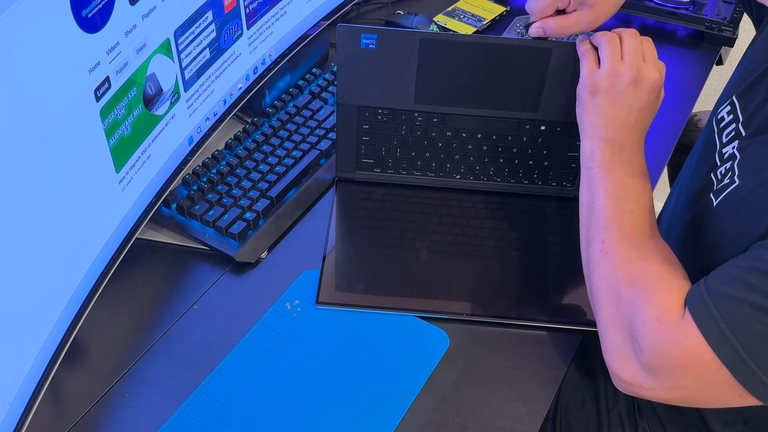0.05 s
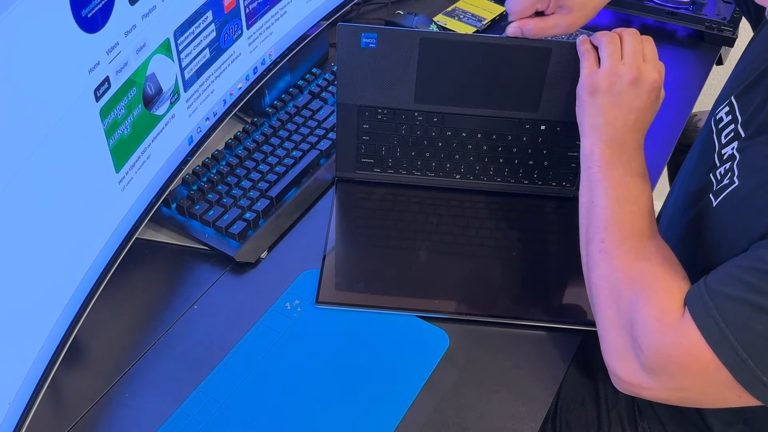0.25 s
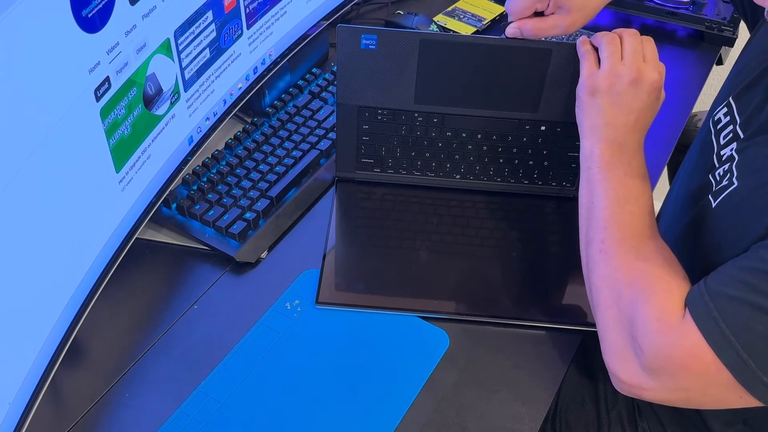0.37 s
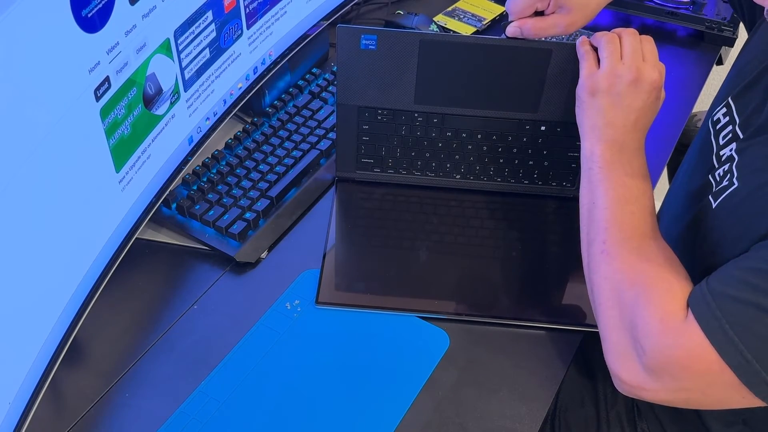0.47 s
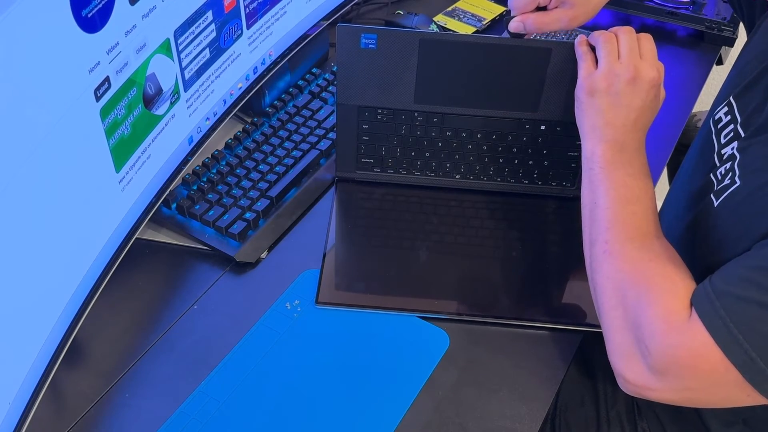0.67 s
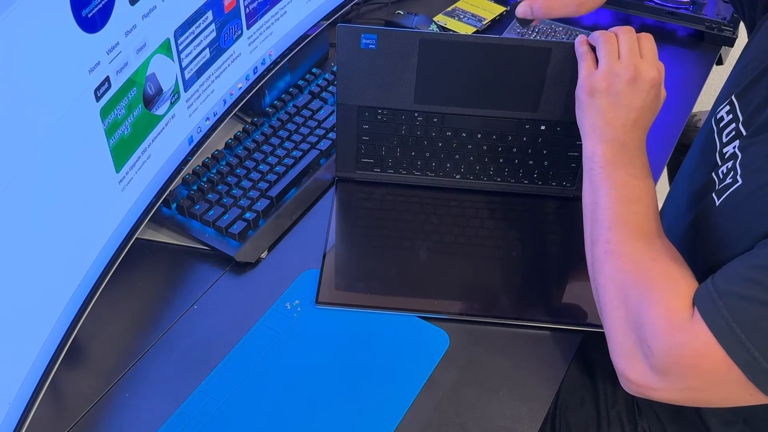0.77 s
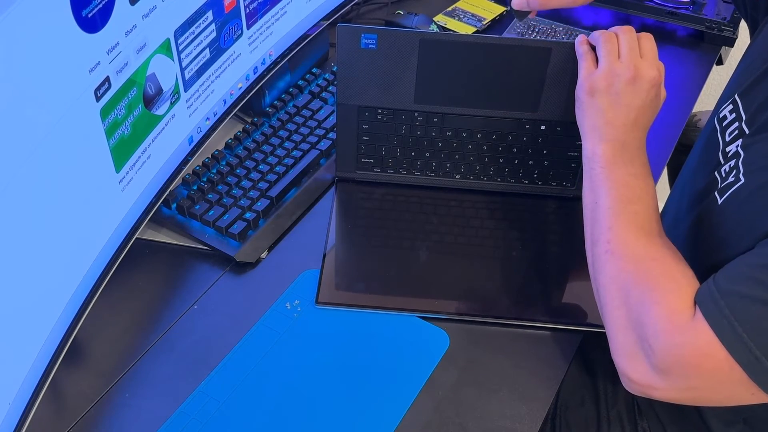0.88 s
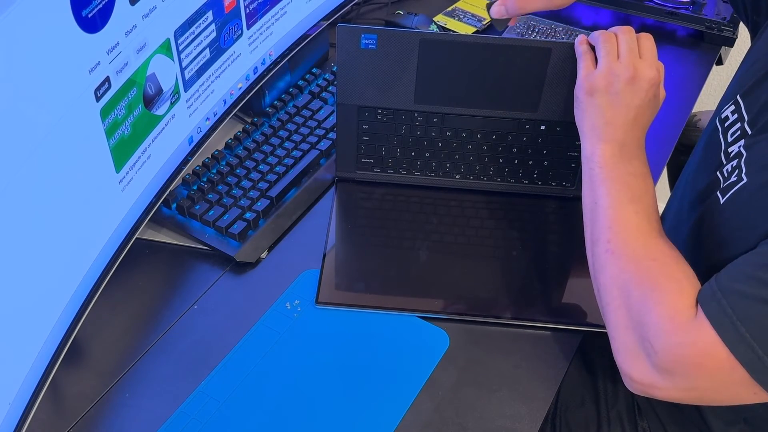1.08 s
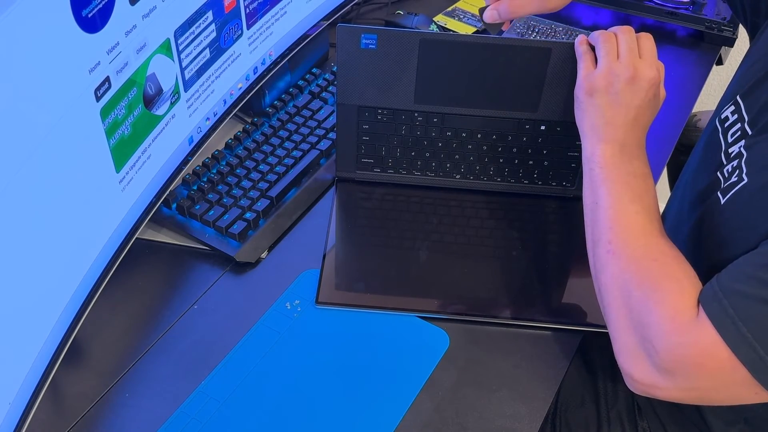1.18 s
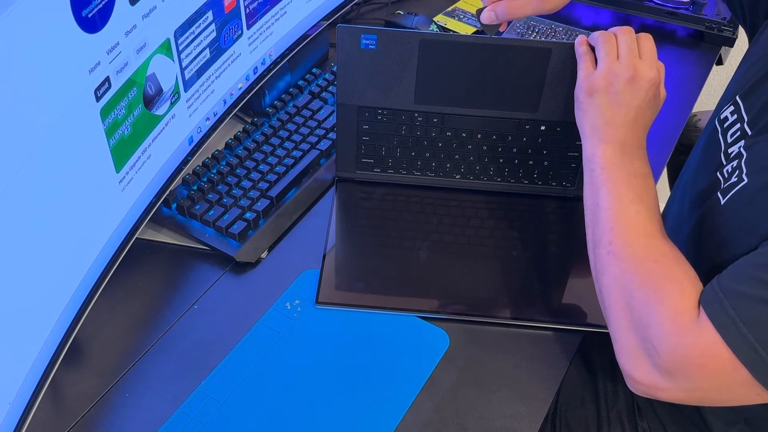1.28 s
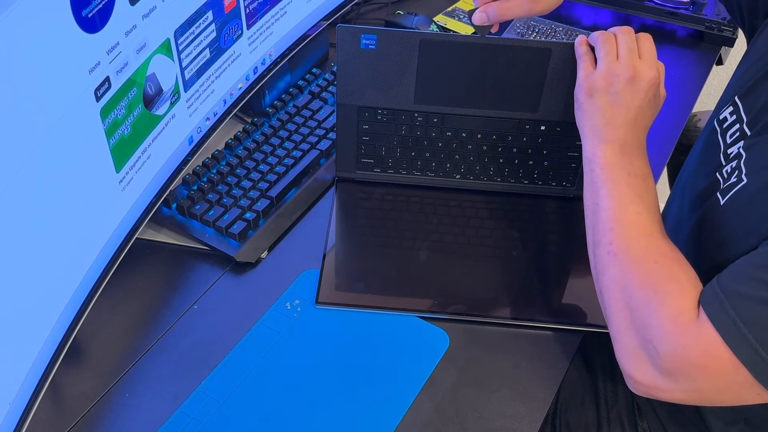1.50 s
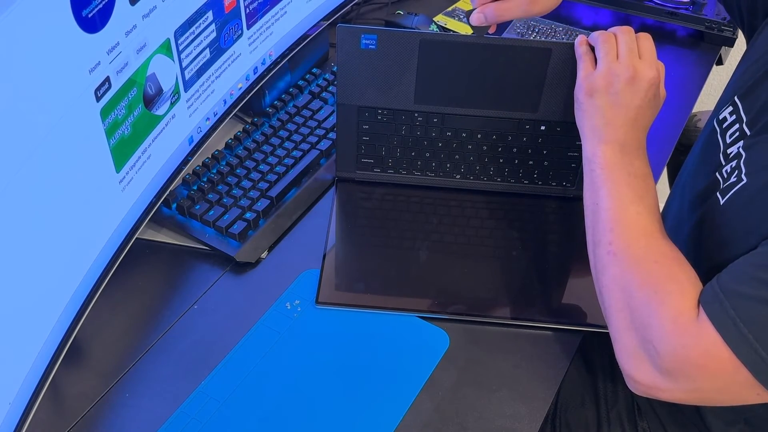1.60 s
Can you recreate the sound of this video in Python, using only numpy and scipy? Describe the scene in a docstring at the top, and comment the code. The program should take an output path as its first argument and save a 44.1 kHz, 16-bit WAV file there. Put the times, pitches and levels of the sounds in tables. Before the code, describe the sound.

A laptop clacks loudly onto a desk after a brief slide, shaking the desk top. A short scrape, soft bumps and light plastic clicks follow, close to the microphone in a quiet room with humming computer fans.

```python
"""Computer fans hum in a quiet room, and something slides on a desk close to a small stereo microphone.
It lands with a loud clack that rings a laptop's case, overloads the microphone and shakes the desk.
A short scrape, soft bumps and light clicks of small plastic things follow. Slides are grainy friction
noise; each contact is a burst of noise plus the damped modes of the case, the part or the desk top."""
import sys
import numpy as np
from scipy import signal
from scipy.fft import rfft, irfft, next_fast_len
from scipy.io import wavfile
from scipy.ndimage import map_coordinates

SR = 44100
rng = np.random.default_rng(int(sys.argv[2]) if len(sys.argv) > 2 else 0)


def int16_out(signal):
    """Quantize to a 16-bit WAV file."""
    q = np.round(np.clip(np.atleast_2d(signal).T, -1, 1) * 32767)
    wavfile.write(sys.argv[1], SR, q.astype(np.int16))


N = 72765

# the clack's tick, main crack, lighter contact and reflection: t/s, crack level/dB, case ring level/dB
CLACK_PARTS = [(0.2313, -12, -33), (0.2325, 0.5, 1.5), (.2364, -12.5, -26.5), (.2448, -11.5, -27)]
# likeness of the room's sound at the two ports: f/Hz, left-right correlation
ROOM_CORRELATION = [(130, 1), (300, 1), (600, .1), (1400, 0.12), (3000, 0.86), (7000, 0.97), (14000, .6)]
# decay of the room's quick tail: f/Hz, t60/s
ROOM_DECAY = [(100, 0.34), (500, .42), (1500, .42), (4000, 0.39), (8000, 0.34), (14000, .27)]
# colour of the room's lingering tail: f/Hz, level/dB
LATE_SPECTRUM = [(300, -2), (900, 7.5), (2000, -3), (5000, -12.5), (8000, -19), (12000, -29.5)]


def amp(db):
    return 10 ** (np.asarray(db) / 20)


def unit_rms(x):
    return x / np.sqrt(np.mean(x ** 2) + 1e-20)


def along(points, hz):
    """Read (f/Hz, value) points on a log frequency axis."""
    f, values = np.transpose(points)
    return np.interp(np.log(hz + 1), np.log(f + 1), values)


def wobble(rate):
    """A smooth random curve, rate knots a second."""
    return map_coordinates(rng.standard_normal(4096), [np.arange(N) * rate / SR], mode="wrap")


def filtered(x, response):
    """Filter x by a complex response of frequency."""
    size = next_fast_len(N + SR // 2)
    return irfft(rfft(x, size) * response(np.fft.rfftfreq(size, 1 / SR)), size)[..., :N]


def noise(spectrum, tilt_db=0, size=N):
    """Coloured noise of rms 1, tilted per octave."""
    padded = next_fast_len(size)
    hz = np.fft.rfftfreq(padded, 1 / SR)
    white = rfft(rng.standard_normal(padded))
    gain = amp(along(spectrum, hz) + tilt_db * np.log2(hz + 1))
    return unit_rms(irfft(white * gain, padded)[:size])


def stereo_noise(spectrum, correlation):
    """Coloured noise with a given left-right correlation."""
    def mid_side_gains(hz):
        angle = np.arccos(np.clip(along(correlation, hz), -1, 1)) / 2
        return np.array([np.cos(angle), np.sin(angle)])
    mid, side = filtered(np.array([noise(spectrum), noise(spectrum)]), mid_side_gains)
    return np.array([mid + side, mid - side])


def fade(t, t60):
    """Exponential decay by 60 dB in t60."""
    return np.exp(-np.log(1000) * t / np.maximum(t60, 1e-3))


def dying(x, t60s):
    """Each frequency of x dies at its own speed."""
    hz, t, bands = signal.stft(x, SR, nperseg=128)
    return signal.istft(bands * fade(t, along(t60s, hz)[:, None]), SR, nperseg=128)[1][..., :N]


def ring(modes, attack_cycles, scatter_db=1):
    """Damped modes after one contact; the lower ones take longer to build."""
    t = np.arange(SR // 3) / SR
    out = np.zeros_like(t)
    for hz, db, t60 in modes:
        envelope = fade(t, t60) * (1 - np.exp(-t * hz / attack_cycles))
        out += amp(db + scatter_db * rng.normal()) * envelope * np.sin(2 * np.pi * hz * t)
    return out


def add(track, start_s, sound):
    """Mix a sound into the track."""
    part = track[max(round(start_s * SR), 0):][:len(sound)]
    part += sound[:len(part)]


def fans():
    """Computer fans behind everything: steady air noise and a few slightly unsteady hum lines."""
    # hum of fans and mains: f/Hz, level/dB
    hum_lines = [(121, -48), (162, -58.5), (200, -54), (284, -51.5), (308, -51.5)]
    # moving air: f/Hz, level/dB
    air_spectrum = [(20, -25), (40, -6.5), (65, 0), (110, -1.5), (200, -2), (300, -1), (500, -8),
                    (900, -14), (2000, -22), (3000, -37), (4500, -44), (9000, -51.5), (10500, -43.5),
                    (11600, -36.5), (12400, -48.5), (15500, -43)]
    # its likeness at the two ports: f/Hz, left-right correlation
    air_correlation = [(100, 0.98), (300, 0.55), (700, 0.31), (1400, .4), (3000, .8), (7000, 1), (14000, 1)]
    t, hum = np.arange(N) / SR, np.zeros(N)
    for hz, db in hum_lines:
        peak = amp(db + 0.57 * wobble(4.6)) * np.sqrt(2)
        hum += peak * np.sin(2 * np.pi * hz * t + 0.6 * wobble(8))
    return amp(-42 + 0.23 * wobble(11)) * stereo_noise(air_spectrum, air_correlation) + hum


def slides():
    """Grainy friction on the desk swells, holds and stops with each push, and rings the sliding part."""
    # pushes: t/s, attack/s, hold/s, release/s, hiss level/dB, tilt/(dB per octave), body level/dB
    strokes = [(0.024, .03, 0.023, .14, -45.5, 1, -65), (0.137, .02, 0.069, 0.11, -48.5, -0.3, -49.5),
               (.63, 0.036, .02, 0.042, -42, -3.2, -57.5), (0.662, 0.01, .04, 0.019, -35, 0, -37)]
    # rubbing noise: f/Hz, level/dB
    rub_spectrum = [(200, -16), (400, 2.5), (900, -5), (1600, 4.5), (2800, -1.5), (3300, -4.5), (6000, -10),
                    (8000, -9.5), (9500, -13.5), (11500, -6), (15000, -8)]
    # resonances of the sliding part: f/Hz, width/Hz, level/dB
    resonances = [(428, 51, -2), (1340, 50, -5.5), (1561, 30, -2), (1700, 43, -4), (2150, 30, -0.5),
                  (2370, 50, -3), (2800, 53, -6)]
    grain_db, catches_per_s = 1.5, 300

    def body_response(hz):
        return sum((-1) ** k * amp(db) * 1j * hz * width / (centre ** 2 - hz ** 2 + 1j * hz * width)
                   for k, (centre, width, db) in enumerate(resonances))
    t, out = np.arange(N) / SR, np.zeros(N)
    for start, attack, hold, release, hiss_db, tilt_db, body_db in strokes:
        envelope = np.interp(t, start + np.cumsum([0, attack, hold, release]), [0, 1, 1, 0])
        friction = unit_rms(noise(rub_spectrum, tilt_db) * amp(grain_db * wobble(catches_per_s)))
        body = unit_rms(filtered(friction, body_response))
        out += envelope * (amp(hiss_db) * friction + amp(body_db) * body)
    return out


def room_tail(spectrum, late_db):
    """The small room's decay in stereo: a quick tail and a fainter one that lingers."""
    quick = dying(stereo_noise(spectrum, ROOM_CORRELATION), ROOM_DECAY)
    late = stereo_noise(LATE_SPECTRUM, ROOM_CORRELATION) * fade(np.arange(N) / SR, t60=1)
    return quick + amp(late_db) * late


def room_reverb(x):
    """The room answers light handling after a short delay."""
    # colour of the quick tail: f/Hz, level/dB
    room_spectrum = [(80, -1), (300, -1), (600, -0.5), (1000, -1), (2500, -5), (5000, -1), (8000, -2.5),
                     (14000, -2)]
    t, delay_s = np.arange(N) / SR, 0.006
    tail = room_tail(room_spectrum, late_db=-23) * np.clip(t / delay_s - 1, 0, 1)
    return signal.fftconvolve(x[None], tail / np.linalg.norm(tail[0]), axes=1)[:, :N]


def clack():
    """Close up, a tick, the main crack and a lighter contact ring the case; a quick reflection follows."""
    # the crack: f/Hz, level/dB
    crack_spectrum = [(150, -16.5), (450, -2), (750, -8), (1000, -7.5), (1500, 1), (2800, 1), (3400, -7),
                      (5000, -5), (8000, -2.5), (9500, -13.5), (12000, -4), (15500, -5.5)]
    # its decay: f/Hz, t60/s
    crack_decay = [(300, 0.065), (2000, 0.045), (7000, 0.028), (14000, 0.017)]
    # modes of the laptop's case: f/Hz, level/dB, t60/s
    case_modes = [(299, -10, 0.061), (418.2, -4.5, .03), (508.9, 1.5, 0.022), (571, 2.5, 0.024),
                  (787.6, -15, .1), (990, -21.5, 0.061), (1253, -9.5, .06), (1456, -6, 0.044),
                  (1557, -9.5, .05), (1887, -10.5, 0.051), (2070, -19.5, 0.12), (2550, -18, 0.18),
                  (2710, -26, .18), (2927, -11.5, .07), (3880, -20, .08), (4317, -25, 0.15),
                  (4675, -19, 0.073), (8226, -26, .08)]
    out = np.zeros(N)
    for start, crack_db, ring_db in CLACK_PARTS:
        add(out, start, amp(crack_db) * dying(noise(crack_spectrum, size=8192), crack_decay))
        add(out, start, amp(ring_db) * ring(case_modes, attack_cycles=2.4))
    return out


def clack_wash():
    """The clack's main crack fills the room with an even tail."""
    # the room's answer to the clack: f/Hz, level/dB
    wash_spectrum = [(80, -8.5), (200, -3.5), (350, -1.5), (600, 1.5), (900, 0.5), (1400, 2), (2000, -6.5),
                     (2800, -4.5), (3400, -12.5), (5500, -13.5), (8000, -9.5), (9500, -22.5), (12000, -13),
                     (15500, -19)]
    t, out = np.arange(N) / SR, np.zeros((2, N))
    start, rise_s = CLACK_PARTS[1][0], 0.007
    tail = room_tail(wash_spectrum, late_db=-17.5) * np.clip(t / rise_s, 0, 1)
    for channel, sound in zip(out, tail):
        add(channel, start, amp(-12.5) * sound)
    return out


def desk_bumps():
    """Soft pushes thud and set the desk top booming, each favouring the modes near one frequency."""
    # bumps on the desk: t/s, boom level/dB, favoured f/Hz, thud level/dB
    bumps = [(0.244, -22.5, 75.5, -38), (0.299, -28, 80, -56), (.353, -21.5, 126, -28),
             (.927, -31.5, 96, -50), (1.256, -38, 89.8, -50), (1.562, -24, 98, -57.5),
             (1.601, -27.5, 96, -52)]
    # modes of the desk top: f/Hz, level/dB, t60/s
    desk_modes = [(65, 1.5, 0.56), (96, 2, 0.29), (122.4, 1, .2), (160, -6, .12)]
    # dull thud: f/Hz, level/dB
    thud_spectrum = [(50, -12), (150, -2.5), (300, -2), (450, -12.5), (800, -18.5), (2000, -40),
                     (6000, -70)]
    fall_db_per_octave, rise_s = 22.5, 0.0037
    t, out = np.arange(N) / SR, np.zeros(N)
    thud_envelope = fade(t, t60=0.24) * np.clip(t / rise_s, 0, 1)
    for start, boom_db, push_hz, thud_db in bumps:
        modes = [(hz, db - fall_db_per_octave * abs(np.log2(hz / push_hz)), t60)
                 for hz, db, t60 in desk_modes]
        add(out, start, amp(boom_db) * ring(modes, attack_cycles=0.87))
        add(out, start, amp(thud_db) * noise(thud_spectrum) * thud_envelope)
    return out


def plastic_clicks():
    """Small plastic parts catch, are set down and rattle: each contact snaps and rings briefly."""
    # light contacts: t/s, snap level/dB, ring level/dB, tilt/(dB per octave)
    contacts = [(.682, -36, -55.5, 17), (.714, -36.5, -60, 18), (1.477, -54, -86, 2), (1.5635, -39, -50, 1),
                (1.5672, -29, -42.5, .5), (1.5705, -33.5, -43, 3), (1.578, -36, -49.5, -0.5),
                (1.593, -41.5, -45.5, 0.5), (1.605, -39.5, -54, -1), (1.641, -47, -60, -0.5)]
    # snap of a contact: f/Hz, level/dB
    snap_spectrum = [(300, 2), (1000, -0.5), (1600, -0.5), (2500, -4), (4000, -2), (6000, -7.5), (8300, -1),
                     (10000, -4.5), (13000, -10.5), (15500, -16)]
    # its decay: f/Hz, t60/s
    snap_decay = [(500, 0.055), (4000, .05), (14000, 0.016)]
    # modes of the small part: f/Hz, level/dB, t60/s
    part_modes = [(3840, 5, .04), (4020, -4, .035), (4600, -3, .06), (6400, -4, .04), (7000, -19, .04),
                  (8000, -1, .03), (8410, 2, .05), (10700, -5, 0.029)]
    out = np.zeros(N)
    for start, snap_db, ring_db, tilt_db in contacts:
        add(out, start, amp(snap_db) * dying(noise(snap_spectrum, tilt_db, size=8192), snap_decay))
        add(out, start, amp(ring_db) * ring(part_modes, attack_cycles=2.4, scatter_db=6))
    return out


def port_response(hz):
    """The microphone's two ports differ slightly in phase, and by a constant lag in the top octave."""
    # phase between the ports: f/Hz, left lead/rad
    port_phase = [(100, 0.1), (700, -0.2), (1100, -0.5), (2000, 0.4), (3200, .7), (5000, .45), (7000, -0.9),
                  (8000, 0.6)]
    split_hz, blend_hz, aligned_hz, lag_s = 8400, 900, 7950, 0.00032
    top = np.clip((hz - split_hz) / blend_hz, 0, 1)
    lead = along(port_phase, hz) - top * 2 * np.pi * (hz - aligned_hz) * lag_s
    return np.exp(0.5j * np.array([lead, -lead]))


def scene():
    """At the desk: the clack and the lighter handling, close by in a small room, over the fans."""
    handling = plastic_clicks() + slides()
    return clack() + clack_wash() + handling + amp(-8) * room_reverb(handling) + desk_bumps() + fans()


def record(dry):
    """A small stereo microphone, a touch louder on the left: peaks overload it, the top is cut off."""
    balance_db, ceiling, top_hz = 0.47, 0.99, 15600
    ports = filtered(dry, port_response) * amp([[balance_db], [-balance_db]])
    clipped = ports / (1 + np.abs(ports / ceiling) ** 6) ** (1 / 6)
    return filtered(clipped, lambda hz: hz < top_hz)


dry = scene()
out = record(dry)
int16_out(out)
```